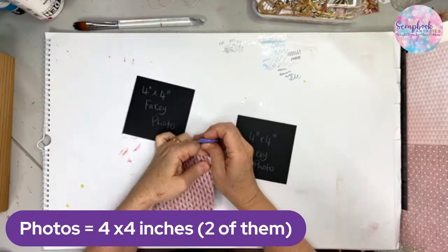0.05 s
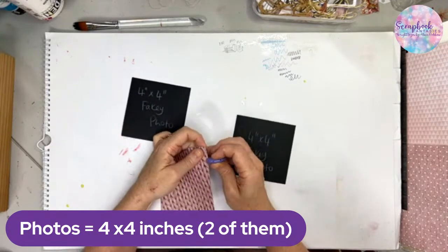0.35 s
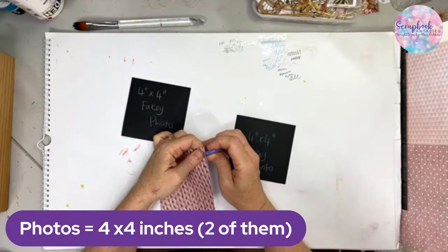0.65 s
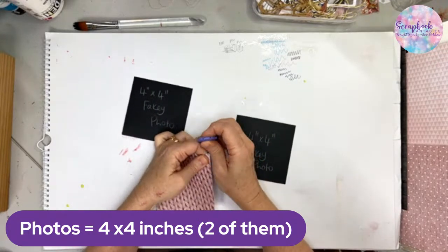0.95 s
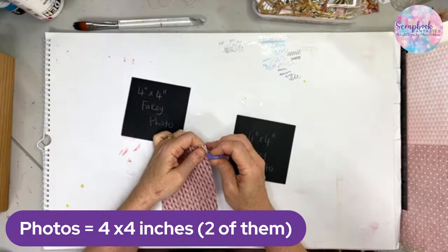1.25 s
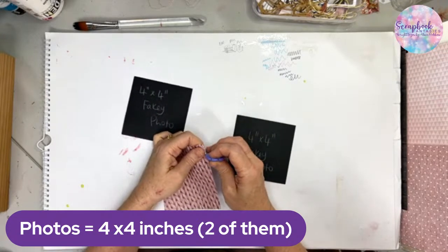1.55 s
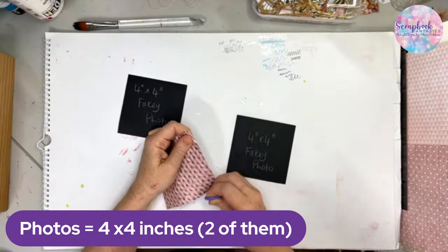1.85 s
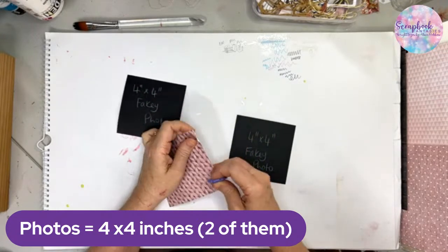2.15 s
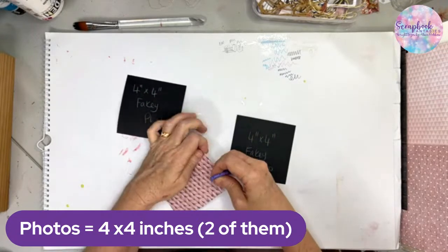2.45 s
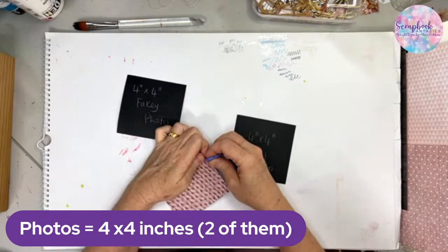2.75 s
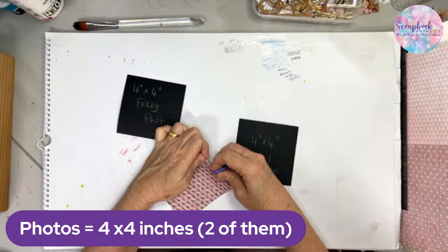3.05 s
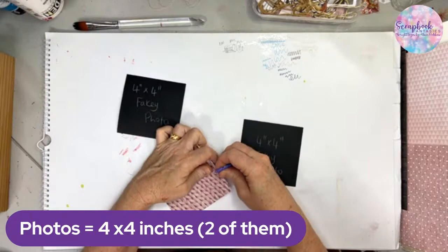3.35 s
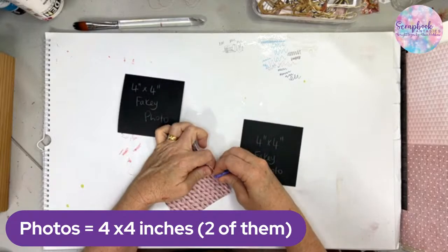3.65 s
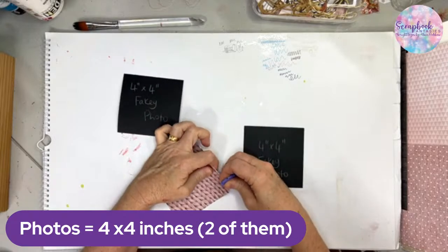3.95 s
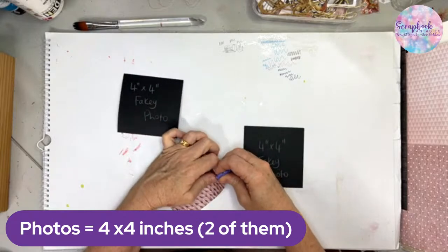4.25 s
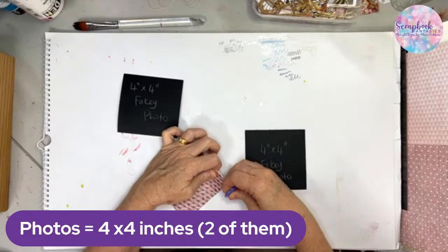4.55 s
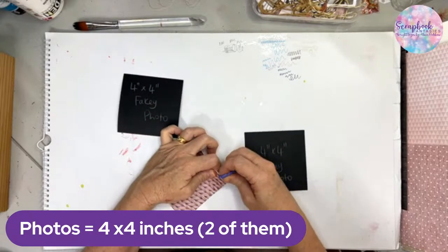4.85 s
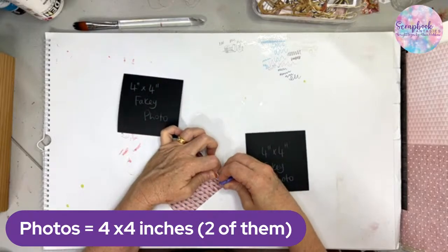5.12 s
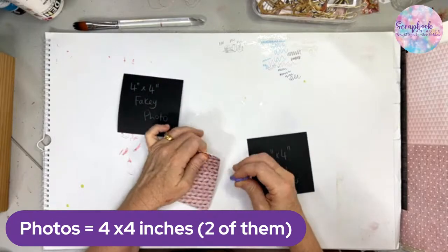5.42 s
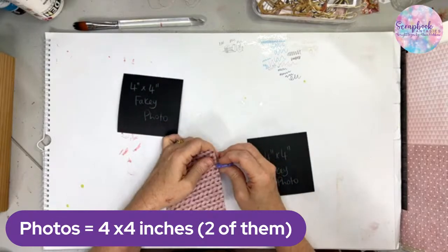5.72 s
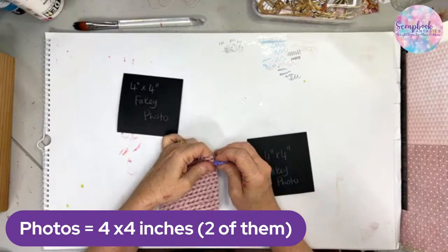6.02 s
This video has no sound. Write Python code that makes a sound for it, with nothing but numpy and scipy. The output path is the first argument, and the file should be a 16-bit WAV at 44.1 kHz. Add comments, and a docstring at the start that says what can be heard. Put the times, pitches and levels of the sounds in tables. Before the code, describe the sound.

A small distressing tool scrapes the edge of a sheet of craft paper in short, uneven strokes, sometimes catching with a sharp little crack. The loudest cluster comes early, followed by a second of faint finger rubbing, then more scattered scrapes. A few dull taps and thin paper squeaks fall in between. The microphone is close, over a table in a small room with soft background noise and a faint hum.

```python
"""A sharp snag and a rasp, close to the microphone: a hand-held distressing tool scrapes the edge of
a sheet of craft paper, over a table in a small room. The blade tears fibres in short strokes and catches
now and then; every new grip gives the sheet new resonances. Between strokes the fingers shift, the paper
squeaks thinly and the tool taps it. Behind it all lie soft room noise and a faint mains hum."""
import sys
import numpy as np
from scipy import signal
from scipy.fft import rfft, irfft, next_fast_len
from scipy.io import wavfile

SR = 44100
rng = np.random.default_rng(int(sys.argv[2]) if len(sys.argv) > 2 else 0)


def put_to_file(sound):
    """Save the sound as 16-bit audio at rate SR, in the file named by the first command-line argument."""
    columns = np.atleast_2d(sound).T  # one column per channel
    safe = np.clip(columns, -1, 1)
    whole_steps = np.round(safe * 32767)
    wavfile.write(sys.argv[1], SR, whole_steps.astype(np.int16))


N = 268128
TIME = np.arange(N) / SR

# The blade bites, drags and leaves the edge. Each row: start, bite, drag and fade in seconds, then in dB
# rasp level, swell of pressure, flex level, hiss level and extra growth of the hiss.
# Levels are relative and are reached at the end of the drag.
BLADE_STROKES = [ (0.046, 0.0209, 0.016, 0.0964, -22.5, 6.5, -47, -33, 8),
                 (0.126, 0.0329, 0.0617, 0.075, -53, -2, -67.5, -72.5, -3.5),
                 (0.678, 0.0385, 0.0349, 0.0453, -41, -2.5, -60.5, -49, 2.5),
                 (0.845, 0.0189, 0.0118, 0.09, -53.5, -2, -53.5, -61.5, 3),
                 (0.961, 0.01887, 0.0111, 0.075, -32.5, 2, -40.5, -40, 0),
                 (1.372, 0.012, 0.0175, 0.0657, -36.5, 0, -70.5, -69, 1),
                 (1.643, 0.0193, 0.0708, 0.0276, -27.5, 17.5, -38, -43.5, -5.5),
                 (1.724, 0.01214, 0.0978, 0.069, -23, -1.5, -28.5, -31, 13.5),
                 (1.828, 0.008, 0.03236, 0.0853, -29, -4.5, -49.5, -37, 11),
                 (1.971, 0.0224, 0.0326, 0.0536, -41, -7, -52.5, -50, 8),
                 (3.045, 0.0532, 0.0487, 0.0193, -31.5, 3.5, -57, -47, 12),
                 (3.097, 0.0127, 0.0866, 0.0773, -32.5, -1.5, -56.5, -44.5, 4.5),
                 (3.407, 0.011, 0.0101, 0.0487, -36, 2.5, -41.5, -57, 8),
                 (3.694, 0.0495, 0.096, 0.0335, -39.5, 5, -49.5, -52, 13),
                 (3.802, 0.01107, 0.077, 0.0582, -35, -7, -46.5, -48.5, 0),
                 (3.982, 0.01426, 0.013, 0.086, -48, 2, -55.5, -66.5, 4.5),
                 (4.168, 0.01166, 0.0134, 0.0335, -44.5, 4.5, -56, -61, -6),
                 (4.401, 0.00987, 0.0155, 0.08, -37.5, 1, -59.5, -43.5, 13),
                 (4.485, 0.07, 0.088, 0.0313, -33, 11, -57, -43, 4),
                 (4.589, 0.008, 0.0104, 0.0837, -27, 4, -37, -35, 8),
                 (5.158, 0.02155, 0.0445, 0.039, -47, -2.5, -58.5, -47, 18.5),
                 (5.218, 0.018, 0.0472, 0.055, -23, 13, -41, -38.5, -4.5),
                 (5.687, 0.0434, 0.0109, 0.03, -49, -0.5, -61.5, -70, 1),
                 (6.044, 0.0283, 0.0272, 0.06, -37, -5, -51.5, -49.5, 19), ]
# Resonances of the held sheet, one list a stroke; the first is its flexing, the rest belong to the edge.
# Each entry: frequency in Hz, width in Hz before finger damping, relative level in dB.
GRIP_MODES = [
    [(751, 170, -24), (1150, 2300, -39.5), (1443, 62, -5.5), (1620, 170, 1), (2844, 2030, -12),
     (4800, 1080, -33.5)],
    [(700, 800, -15), (1660, 1930, -2.5), (3380, 2950, 1.5)],
    [(330, 1270, -22), (1377, 80, -9.5), (1620, 160, 2), (2130, 180, -9), (2590, 120, -6), (3480, 1560, -4)],
    [(580, 530, 0), (1580, 307, -1), (2740, 3040, -9), (5014, 390, 2)],
    [(680, 460, -7), (1656, 300, -1.5), (2002, 150, -4.5), (2610, 346, 1), (3510, 830, 0.5),
     (5060, 800, -4)],
    [(330, 840, -24), (1960, 206, -7.5), (2726, 170, -1.5), (3224, 304, 0.5), (4270, 1400, -13.5)],
    [(800, 430, -9), (1380, 450, -3.5), (1700, 280, 2.5), (2500, 2300, -8.5), (4860, 620, -15)],
    [(879, 700, -9), (1308, 300, -0.5), (1650, 250, 0), (1941, 150, -2.5), (2470, 2800, -7.5),
     (4900, 520, -9)],
    [(402, 63, -8), (1155, 4400, -10), (1620, 500, -11.5), (2830, 1500, -1), (3970, 3700, -1.5)],
    [(375, 193, -13), (1292, 890, -5.5), (1725, 258, 0), (2670, 1000, -4.5), (4400, 1600, -18.5)],
    [(660, 590, -20), (1750, 680, -3), (2500, 850, 1.5), (3326, 1400, -0.5), (4830, 3360, -13)],
    [(530, 530, -22), (1315, 120, -1), (1602, 360, -3), (2020, 210, 1), (2440, 544, 1), (3076, 3450, -4)],
    [(700, 234, -4), (1912, 540, -2), (2320, 234, 0.5), (3037, 187, -7.5)],
    [(461, 430, -10), (1929, 520, 2.5), (2530, 645, 0), (4034, 1520, -1.5)],
    [(644.3, 160, -11), (1315, 305, -3), (1620, 394, -8), (2200, 1440, 0.5), (3250, 1060, -1.5),
     (4606.2, 1600, -10)],
    [(440, 610, -6), (1940, 2440, -7.5), (2190, 450, 5)],
    [(530, 560, -17), (1620, 82, 0), (3550, 3800, -18.5)],
    [(336, 130, -17), (1690, 252, 3), (2352, 303, -3.5), (2600, 1950, -13), (4350, 1360, -6)],
    [(450, 900, -18), (1620, 130, -0.5), (2575, 1570, 2), (3620, 290, 3), (4500, 970, -3)],
    [(462.5, 83, -8), (1221, 83, 3), (1640, 140, -7), (1887, 150, 5.5), (2320, 2800, 2.5),
     (2590, 170, -3.5)],
    [(400, 258, -15), (1460, 760, -16.5), (2317, 270, 2), (3680, 990, -7)],
    [(803, 150, -14), (1148, 6700, -13), (1783, 566, -4), (2516, 195, 3.5), (3385, 950, -5.5),
     (4630, 800, -7.5)],
    [(332, 260, -9), (1750, 1100, -10.5), (2538, 79, 1)],
    [(804, 170, -14), (1384, 110, -6), (1565, 344, -2.5), (1844, 404, -3), (2405, 160, -7), (3340, 516, -6)],
]
# The blade catches and lets go, or the sheet buckles.
# Each row: start in seconds, relative peak in dB, ring in Hz, relative crack level in dB.
BLADE_SNAGS = [(0.044, -15.5, 1580, -23), (0.054, -14.5, 1592, -34.5), (0.060, -8.5, 1620, -27.5),
               (0.666, -28, 1535, -14.5), (0.963, -19, 2610, -15), (1.369, -34.5, 3170, -27),
               (1.724, -3, 1660, -31), (1.735, -5.5, 1690, -11), (1.796, -1, 1660, -16),
               (1.828, -2, 1940, 0), (3.034, -21.5, 2200, -19.5), (3.055, -23.5, 2350, -25.5),
               (3.096, -27.5, 2450, -18.5), (3.688, -27.5, 2120, -17), (3.713, -29.5, 2380, -15),
               (3.735, -21.5, 1700, -23), (3.797, -8.5, 3340, -26.5), (3.802, -6.5, 2320, -29.5),
               (4.402, -30.5, 1783, -13.5), (4.514, -23, 3100, -16.5), (4.588, -10, 1745, -5.5),
               (5.158, -21.5, 2440, -24), (5.239, -22.5, 1750, -19.5), (5.248, -10, 1700, -12.5),
               (5.252, -8, 2590, -15.5), (6.045, -24.5, 1580, -25.5)]
# Dull taps of tool on sheet. Each row: start in seconds, peak in dB, low and high band edges in Hz.
TOOL_TAPS = [(1.827, -23, 303.5, 1040), (1.99, -46, 350, 1910), (2.238, -40, 700, 1487),
             (3.406, -33, 680, 2670), (5.615, -21.5, 712, 2033)]
# Thin squeaks and swishes on the paper.
# Each row: centre in seconds, level in dB, pitch in Hz, width in Hz, half-length in seconds.
PAPER_SQUEAKS = [(0.628, -53.5, 8600, 2500, 0.0323), (0.859, -57.5, 10190, 700, 0.0085),
                 (2.506, -60, 8380, 4500, 0.0285), (3.423, -51.5, 9920, 750, 0.0091),
                 (3.735, -53, 6170, 600, 0.023), (4.195, -62.5, 10990, 605, 0.0091),
                 (4.51, -56, 8600, 800, 0.0286), (4.579, -46, 8740, 884, 0.0394),
                 (5.16, -51, 8876, 750, 0.0057), (5.453, -58.5, 9318, 1400, 0.0268),
                 (6.068, -64.5, 8880, 750, 0.027)]
# Fingers slide on the sheet. Each row: start in seconds, length in seconds, relative level in dB.
FINGER_RUBS = [(0.274, 0.131, -63.5), (0.548, 0.219, -61.5), (0.847, 0.046, -62.5), (1.032, 0.072, -62.5),
               (1.37, 0.009, -53.5), (2.111, 0.023, -61), (2.188, 0.0976, -58.5), (2.468, 0.114, -61),
               (2.621, 0.175, -70), (3.314, 0.019, -57.5), (3.386, 0.128, -63.5), (3.649, 0.041, -59),
               (3.989, 0.2196, -58.5), (4.252, 0.16, -65.5), (4.675, 0.0253, -71.5), (5.111, 0.0255, -59.5),
               (5.43, 0.315, -61), (5.687, 0.094, -61), (5.798, 0.144, -70)]
# Narrow resonances of sheet and table. Each row: frequency in Hz, width in Hz, boost in dB.
SHEET_RESONANCES = [(679.4, 40, 7.5), (807.1, 30, 6), (941, 40, 4.5), (1255, 12, 4.5), (1350, 46, 4),
                    (1604, 48, 7), (1700, 30, 6), (2095, 30, 3), (2418.7, 30, 5.5), (2560, 45, 6.5)]
# Spectra of tearing fibres, skin on paper and room noise. Each row: frequency in Hz, relative level in dB.
TEAR_SPECTRUM = [(2650, -22.5), (4500, -5), (5010, -3), (5710, -9.5), (6330, -8.5), (9270, -5),
                 (10600, -12), (12200, -23), (12600, -35.5), (15400, -39)]
RUSTLE_SPECTRUM = [(530, -46.5), (900, -7), (1090, -11.5), (1460, -7), (1680, -4.5), (3700, -8.5),
                   (7670, -15), (9480, -12.5), (15000, -46)]
AIR_SPECTRUM = [(25, -20), (70, -13.5), (125, -1.5), (200, -3.5), (340, 2.5), (590, -7.5), (1000, -9.5),
                (2000, -17), (4000, -22.5), (10000, -29.5), (15000, -47.5)]
# Mains hum, sidebands that make it throb, and one higher line.
# Each row: frequency in Hz, relative level in dB.
HUM_LINES = [(89.1, -81), (94.5, -74), (100, -73), (102.7, -74.5), (105.4, -80), (148.8, -80.5)]
# Near reflections at the microphone. Each row: delay in seconds, level in dB against the direct sound.
REFLECTIONS = [(.0065, -13.5), (0.0123, -24.5)]


def scraping(rasp_db=-2.5, flex_db=-4.5, hiss_db=-3.0, least_width_hz=190):
    """In each stroke tearing fibres drive the resonances of that grip, and hiss on their own."""
    out = np.zeros(N)
    hiss = coloured(fibres(N, per_s=7000, spread_db=1.5), TEAR_SPECTRUM)
    for stroke, grip in zip(BLADE_STROKES, GRIP_MODES):
        start, bite, drag, fade, edge_db, swell_db, sheet_db, fibre_db, growth_db = stroke
        span = (TIME >= start - 1.5 * bite) & (TIME < start + drag + 2 * fade)
        t = TIME[span] - start
        slips = waver(len(t), depth_db=0.23, top_hz=226)  # stick and slip clumps the snaps
        rings = []
        for hz, width, db in grip:
            snaps = slips * fibres(len(t), per_s=3500, spread_db=2.5)
            coupling = waver(len(t), depth_db=1.52, top_hz=25.1)  # the blade passes nodes and bellies
            width = max(width, least_width_hz)  # the holding fingers damp the mode
            rings.append(from_db(db) * coupling * resonance(resonance(snaps, hz, width), hz, width))
        rasp = contact(t, bite, drag, fade, swell_db) * rms_one(sheet(sum(rings[1:])))
        flex = contact(t, bite, drag, fade * 0.63, swell_db) * rms_one(sheet(rings[0]))
        tear = contact(t, bite, drag, fade * 1.418, swell_db + growth_db) * rms_one(slips * hiss[span])
        out[span] += from_db(rasp_db + edge_db) * rasp
        out[span] += from_db(flex_db + sheet_db) * flex
        out[span] += from_db(hiss_db + fibre_db) * tear
    return out


def fibres(size, per_s, spread_db):
    """Fibres snap at random moments: many small clicks and a few large ones."""
    strengths = from_db(spread_db * np.minimum(rng.exponential(1, size), 4))
    snapped = rng.random(size) < per_s / SR
    return rms_one(snapped * strengths * rng.choice([-1, 1], size))


def sheet(x):
    """Narrow fixed resonances colour the rasp and flex of each scraping stroke."""
    return x + sum((from_db(db) - 1) * resonance(x, hz, width) for hz, width, db in SHEET_RESONANCES)


def contact(t, attack, hold, release, swell_db=0, range_db=36.5):
    """Gain of a contact that takes hold at t = 0, moves to 1 during the hold and dies away."""
    outside = np.maximum(-t, 0) / attack + np.maximum(t - hold, 0) / release
    hold_left = np.clip(1 - t / hold, 0, 1)
    return from_db(-range_db * outside - swell_db * hold_left)


def snagging(level_db=-8.0, width_hz=480, crack_db=-3.5, catches=3, chatter_s=0.0055, loss_db=8.5):
    """At each release the edge cracks and rings; the blade catches again, each time more weakly."""
    out, t = np.zeros(N + SR), TIME[:SR // 20]
    for start, db, hz, snag_crack_db in BLADE_SNAGS:
        for k in range(catches):
            click = blow(t, tear_db=-18.0, tear_s=0.0018)
            ring = rms_one(resonance(butter(click, [hz / 2, hz * 2], "band"), hz, width_hz))
            crack = rms_one(butter(click, [2600, 8500], "band", order=3))
            snag = ring + from_db(snag_crack_db + crack_db) * crack
            at = int((start + k * chatter_s * rng.uniform(.8, 1.2)) * SR)
            out[at:at + len(t)] += from_db(db + level_db - k * loss_db) * snag / np.abs(snag).max()
    return out[:N]


def blow(t, tear_db, tear_s):
    """A click with a short tear behind it."""
    return (t == 0) + from_db(tear_db) * rng.standard_normal(len(t)) * np.exp(-t / tear_s)


def tapping():
    """A soft touch of the tool shakes only the lower modes of the sheet."""
    out, t = np.zeros(N + SR), TIME[:SR // 20]
    for start, db, low_hz, high_hz in TOOL_TAPS:
        knock = butter(blow(t, tear_db=-17.5, tear_s=0.0045), [low_hz, high_hz], "band", order=6)
        at = int(start * SR)
        out[at:at + len(t)] += from_db(db) * knock / np.abs(knock).max()
    return out[:N]


def squeaking():
    """Light contact excites a high resonance for a moment."""
    out = np.zeros(N)
    for centre, db, hz, width, half_length in PAPER_SQUEAKS:
        span = np.abs(TIME - centre) < .1
        friction = rng.standard_normal(span.sum())
        whistle = resonance(resonance(friction, hz, width), hz, width)
        envelope = np.exp(-((TIME[span] - centre) / half_length) ** 2)
        out[span] += from_db(db) * envelope * rms_one(whistle)
    return out


def fingers(level_db=-4.5, attack_s=0.0446, release_s=0.12):
    """Skin slides over the paper with a fine, faint grain."""
    pressure = np.zeros(N)
    for start, length, db in FINGER_RUBS:
        span = (TIME > start - attack_s) & (TIME < start + length + release_s)
        pressure[span] += from_db(db) * contact(TIME[span] - start, attack_s, length, release_s)
    grain = coloured(fibres(N, per_s=9400, spread_db=5.0), RUSTLE_SPECTRUM)
    return from_db(level_db) * pressure * grain


def room(x, tail_db, t60_s=0.179, dull_hz=7340):
    """The microphone gets the direct sound, two near reflections and a short, duller tail."""
    t = TIME[:SR // 2]
    diffuse = butter(rng.standard_normal(len(t)), dull_hz, "low", order=1)
    tail = diffuse * from_db(-60 * t / t60_s) * (t > .004)
    response = from_db(tail_db) * tail / np.sqrt(np.sum(tail ** 2))
    response[0] += 1
    for delay, db in REFLECTIONS:
        response[int(delay * SR)] += from_db(db)
    return signal.fftconvolve(x, response)[:N]


def mains_hum(gain_db=0.5):
    """Close lines beat against each other, so the hum throbs slowly."""
    return sum(from_db(gain_db + db) * np.sqrt(2) * np.sin(2 * np.pi * (hz * TIME + rng.random()))
               for hz, db in HUM_LINES)


def room_tone(level_db=-62, lull_at_s=4.795, lull_half_s=0.069, lull_hz=1500):
    """Steady room noise, whose hiss dips briefly once."""
    air = from_db(level_db) * coloured(rng.standard_normal(N), AIR_SPECTRUM)
    lull = .9 * np.exp(-((TIME - lull_at_s) / lull_half_s) ** 4)
    return (1 - lull) * air + lull * butter(air, lull_hz, "low", order=1)


def from_db(db):
    """Decibels to gain."""
    return 10 ** (np.asarray(db) / 20)


def rms_one(x):
    """Scale to rms 1."""
    return x / np.sqrt(np.mean(x ** 2) + 1e-20)


def butter(x, hz, kind, order=2):
    """Causal Butterworth filter."""
    return signal.sosfilt(signal.butter(order, np.clip(hz, 10, .45 * SR), kind, fs=SR, output="sos"), x)


def coloured(x, spectrum):
    """Give a steady sound the spectrum (Hz, dB); rms 1."""
    hz, db = np.transpose(spectrum)
    size = next_fast_len(N)
    bins = np.maximum(np.fft.rfftfreq(size, 1 / SR), 1)
    gain = from_db(np.interp(np.log(bins), np.log(hz), db))
    return rms_one(irfft(rfft(x, size) * gain, size)[:N])


def resonance(x, hz, width_hz):
    """Two-pole resonance with gain 1 at its peak."""
    r = np.exp(-np.pi * width_hz / SR)
    feedback = [1, -2 * r * np.cos(2 * np.pi * hz / SR), r * r]
    return signal.lfilter(np.array([1, 0, -1]) * (1 - r * r) / 2, feedback, x + 1e-18)


def waver(size, depth_db, top_hz):
    """A random gain that changes up to about top_hz times a second."""
    return from_db(depth_db * rms_one(butter(rng.standard_normal(size), top_hz, "low")))


def scene():
    """The paper work at one close microphone; taps spread through the table and stir the room more."""
    paper = scraping() + snagging() + squeaking() + fingers()
    return (room(paper, tail_db=-16) + room(tapping(), tail_db=-12) + mains_hum() + room_tone())[None]


def record(dry, drop_hz=11747, top_db=-22, cutoff_hz=15600):
    """The treble drops steeply above about 12 kHz; the very top is cut."""
    soft = butter(dry, drop_hz, "low", order=12) + from_db(top_db) * dry
    return signal.sosfilt(signal.ellip(10, .1, 80, cutoff_hz, fs=SR, output="sos"), soft)


dry = scene()
out = record(dry)
put_to_file(out)
```